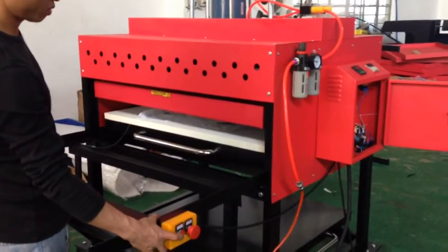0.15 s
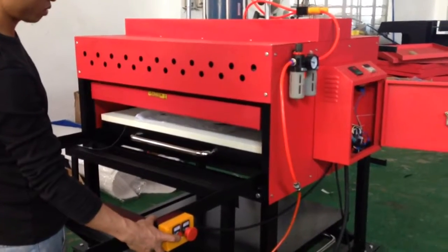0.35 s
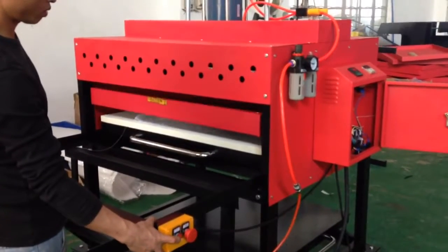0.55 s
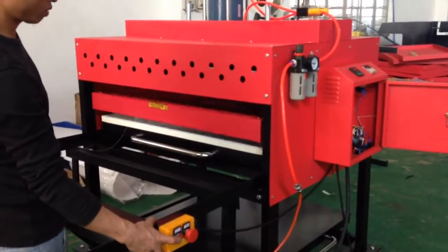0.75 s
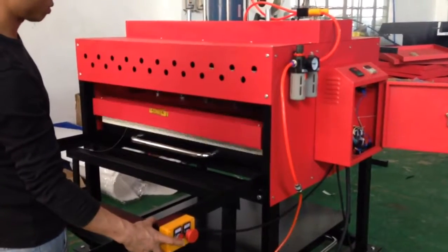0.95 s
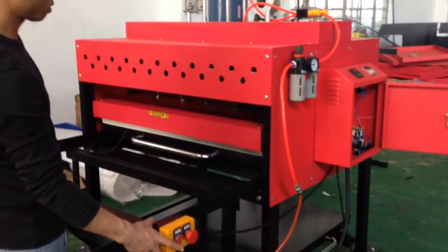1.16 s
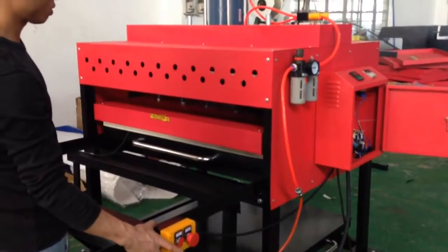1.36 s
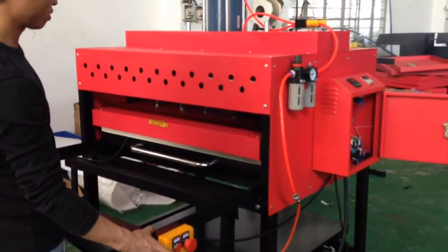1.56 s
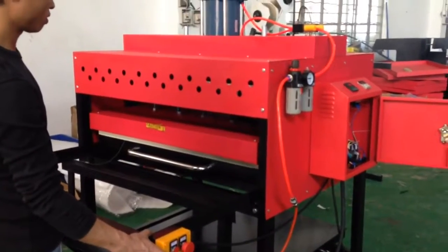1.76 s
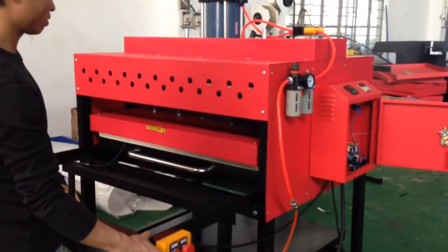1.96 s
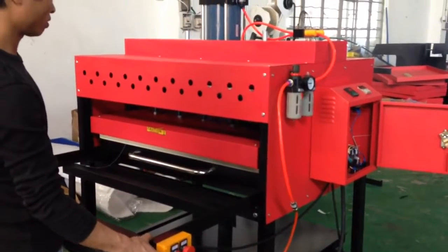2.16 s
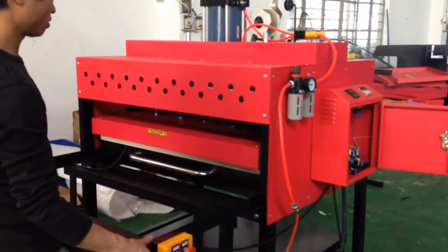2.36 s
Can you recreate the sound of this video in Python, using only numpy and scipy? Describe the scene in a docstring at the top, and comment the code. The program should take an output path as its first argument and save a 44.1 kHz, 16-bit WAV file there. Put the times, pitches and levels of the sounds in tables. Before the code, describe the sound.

Compressed air hisses loudly from a pneumatic press just after a valve clicks and knocks. The hiss dulls and sinks as the plate lands softly, leaving a low machine hum and a faint air leak in the workshop.

```python
"""An air-powered press closes in a workshop, where a small leak hisses and machines hum throughout. First an
electric valve clicks, then slams over and lets out a puff of air. The cylinder empties through a muffler with a
loud hiss, which dulls while its ringing band sinks as the pressure runs out. Meanwhile the press plate rubs and
squeaks on its way down. When it stops, the cylinder judders softly, the clamped frame drones briefly, and a few
faint ticks follow."""
import sys
import numpy as np
from scipy import signal
from scipy.fft import rfft, irfft
from scipy.io import wavfile
from scipy.ndimage import uniform_filter1d

SR = 44100
rng = np.random.default_rng(int(sys.argv[2]) if len(sys.argv) > 2 else 0)


def wav_out(sig):
    """Save sig, one row per channel (or a flat mono array), as 16-bit PCM at SR to the path in sys.argv[1]."""
    wavfile.write(sys.argv[1], SR, np.round(np.clip(np.atleast_2d(sig).T, -1, 1) * 32767).astype(np.int16))


N = 105840
T = np.arange(N) / SR

# how loud and bright the hiss is (time [s], level [dB], treble tilt [dB per octave])
HISS_FLOW = [(.24, -19, -0.5), (.35, -21, 0.5), (.6, -19.5, -0.7), (.85, -20.5, -2.5), (1.05, -21.5, -5),
             (1.24, -24.5, -4), (1.36, -29.5, -8.5), (1.46, -41, -10), (1.56, -45, -18), (1.68, -47.5, -32),
             (1.85, -76, -10), (2.0, -110, -16)]
# tone of the air rushing through the muffler (frequency [Hz], level [dB])
HISS_SPECTRUM = [(40, -40), (180, -53), (400, -13.5), (600, -17.5), (800, -10.5), (1250, -8.5), (1550, -2),
                 (2900, -4.5), (3250, -3.5), (5300, 3), (6500, 1), (7700, -2.5), (9100, 0), (10050, 4),
                 (10900, -6), (12400, 1), (13500, 0), (14200, -9), (15300, -3)]
# the ringing band that sinks with the pressure (time [s], centre [Hz], width [Hz], level [dB])
SINKING_BAND = [(.3, 4300, 1600, -50), (.42, 4360, 1190, -25.5), (.57, 4080, 980, -22),
                (.75, 3730, 850, -24.5), (.9, 3580, 534, -24.5), (1.0, 3300, 230, -27),
                (1.07, 3110, 190, -28.5), (1.19, 3120, 190, -28), (1.25, 2500, 420, -36.5),
                (1.37, 1960, 440, -38), (1.45, 1330, 560, -45), (1.529, 970, 338, -54),
                (1.6, 836, 200, -104)]
# the muffler favours that band's high side (frequency [Hz], gain [dB])
MUFFLER_FILTER = [(2000, -2), (2950, -4), (3200, -3), (6000, 6)]
# the exhaust pipe's upper ring swells, then fades (time [s], level [dB])
UPPER_RING = [(.4, -55), (.7, -25.5), (1.05, -28.5), (1.23, -27), (1.33, -35.5), (1.5, -59.5), (1.7, -96)]
# steady resonances of muffler and frame (frequency [Hz], width [Hz], boost [dB])
MUFFLER_PEAKS = [(735, 35, 5), (1025, 80, 7), (1470, 50, 4), (1820, 70, 3), (2030, 50, 4), (2295, 35, 4),
                 (2550, 90, 2), (3275, 130, 6), (3790, 50, 3), (4100, 60, 3), (4345, 40, 3), (6120, 50, 3)]
# the valve's two knocks (time [s], crack level [dB], rise [s], decay [s], rattle level [dB])
VALVE_KNOCKS = [(0.1662, -34, 0.0022, 0.0075, -41.5), (0.23, -18, .0006, 0.0023, -34)]
# tone of each knock's crack (frequency [Hz], level [dB])
CRACK_SPECTRUM = [(100, -2), (600, -11), (1200, -9.5), (2400, -14), (4200, 5.5), (6000, -3), (7500, -5),
                  (12000, -4), (15500, -7)]
# how the valve and its panel ring (frequency [Hz], width [Hz], level [dB], decay [s])
PANEL_RINGS = [(343, 16, -9.5, 0.051), (428, 28, -10.5, 0.058), (574, 25, -11.5, 0.041),
               (770, 150, -6.5, 0.036), (1090, 110, -0.5, 0.037), (1520, 350, -6.5, 0.045),
               (2100, 150, -12, 0.036), (3930, 110, -15, .025)]
# tone of the first puff (frequency [Hz], level [dB])
PUFF_SPECTRUM = [(30, -4), (70, -2), (160, -5), (300, 4), (600, -6), (1000, -10), (1300, 2), (1650, 5),
                 (2050, 3), (2500, -22), (8000, -25)]
# how the exhaust pipe rings (frequency [Hz], width [Hz], level [dB])
PIPE_RINGS = [(1030, 69, -44), (2040, 49, -28.5)]
# the plate rubs in its guides (time [s], length [s], level [dB])
PLATE_RUBS = [(0.551, 0.11, -45), (0.723, .04, -46), (0.749, 0.014, -49), (0.952, 0.081, -46),
              (1.17, 0.014, -39.5), (1.207, 0.087, -48.5)]
# how the frame rings (frequency [Hz], width [Hz], level [dB])
FRAME_RINGS = [(275, 18, -13.5), (343, 33, -13), (422.3, 13, 1.5), (484, 35, -10.5)]
# a guide squeaks softly (time [s], level [dB])
GUIDE_SQUEAK = [(.57, -75), (.605, -45), (.75, -49), (.79, -75)]
# the cylinder judders as the press stops (time [s], pitch [Hz], level [dB])
CYLINDER_JUDDER = [(1.17, 80, -68), (1.189, 78.6, -36), (1.21, 80, -34), (1.228, 81, -57), (1.25, 89, -38),
                   (1.28, 89, -39), (1.295, 91, -47), (1.313, 94, -32), (1.335, 90, -70)]
# the clamped frame drones (time [s], level [dB])
FRAME_DRONE = [(1.33, -75), (1.39, -49), (1.49, -56), (1.598, -69)]
# tone of the air leak (frequency [Hz], level [dB])
LEAK_SPECTRUM = [(800, -31), (2800, -15.5), (3300, -6.5), (3800, -1), (4040, 4), (4300, -7.5), (4900, -1.5),
                 (5400, -2.5), (6200, -10), (7900, -9.5), (8350, -4), (9300, -6), (11000, -10.5),
                 (13000, -5), (15300, -4)]
# tone of the machines' rumble (frequency [Hz], level [dB])
RUMBLE_SPECTRUM = [(20, -18), (40, -24), (65, 2.5), (105, -4), (135, -6), (300, -6.5), (450, -12),
                   (650, -17.5), (1200, -20), (2200, -20), (5000, -22), (15000, -50)]
# the machines' hum (frequency [Hz], level [dB])
HUM_TONES = [(66, -66.5), (101, -64.5), (183, -65), (355, -69)]
# faint workshop ticks (time [s], level [dB])
FAINT_TICKS = [(1.935, -51), (2.235, -55), (2.314, -57)]
# tone of a tick (frequency [Hz], level [dB])
TICK_SPECTRUM = [(300, -16), (1200, 5), (2600, 6.5), (6000, -14), (15000, -27)]
# how long the workshop echoes (frequency [Hz], time to fade by 60 dB [s])
ECHO_TIMES = [(100, 0.31), (500, 0.92), (1500, 0.76), (3200, 1), (6000, 0.61), (10000, 0.76), (15000, 0.54)]

OPEN_S, OPEN_RISE_S, TREBLE_LAG_S = .231, .013, .003
TILT_FROM_HZ, TREBLE_FROM_HZ = 3960, 5600
PATCH_DB, FLUTTER_DB, ECHO_DB = 1.55, .29, -6.5
LIMIT_DB, SQUEEZE, RECOVER_DB_PER_S = -26.5, .37, 4


def exhaust(size=512):
    """Swirling air leaves the muffler: a broad hiss, a sinking band and an upper ring of steady pitch."""
    frames = dict(nperseg=size, noverlap=size * 3 // 4)
    hz, t, white = signal.stft(rng.standard_normal(N), SR, **frames)
    hz = hz[:, None]
    level_db, tilt = follow(HISS_FLOW, t)
    treble_octaves = np.log2(1 + (hz / TILT_FROM_HZ) ** 4) / 4
    broad = unit(amp(read(HISS_SPECTRUM, hz))) * amp(level_db + tilt * treble_octaves)
    centre, width, band_db = follow(SINKING_BAND, t)
    band = hump(hz, centre, width) * amp(read(MUFFLER_FILTER, hz))
    band = band / np.sqrt((band ** 2).mean(0)) * amp(band_db)
    upper = unit(hump(hz, centre=4720, width=1180)) * amp(follow(UPPER_RING, t)[0])
    # random louder and softer patches across pitch and time
    patches = uniform_filter1d(rng.standard_normal(white.shape), size=5, axis=0)
    patches = unit(uniform_filter1d(patches, size=8, axis=1))
    gain = np.sqrt(broad ** 2 + band ** 2 + upper ** 2) * amp(PATCH_DB * patches)
    hiss = signal.istft(white * gain, SR, **frames)[1][:N]
    hiss = filtered(hiss, lambda f: amp(sum(
        db / (1 + (2 * (f - peak) / wide) ** 2) for peak, wide, db in MUFFLER_PEAKS)))
    return open_port(hiss) * amp(FLUTTER_DB * wander(hz=55))


def open_port(hiss):
    """The outlet opens: the lower part of the hiss comes first, its treble just after."""
    low = filtered(hiss, lambda f: 1 / (1 + (f / TREBLE_FROM_HZ) ** 8))
    return low * ramp(OPEN_S, OPEN_RISE_S) + (hiss - low) * ramp(OPEN_S + TREBLE_LAG_S, OPEN_RISE_S)


def valve():
    """A magnet clicks, then the valve slams over with a puff of air; both knocks rattle its panel."""
    sound = amp(-30) * coloured(PUFF_SPECTRUM) * burst(OPEN_S, rise=.006, decay=.044)
    for start, crack_db, rise, decay, rattle_db in VALVE_KNOCKS:
        rattle = sum(amp(db) * ringing(hz, width) * burst(start, rise=.012, decay=ring_s)
                     for hz, width, db, ring_s in PANEL_RINGS)
        crack = coloured(CRACK_SPECTRUM) * burst(start, rise, decay)
        sound += amp(crack_db) * crack + amp(rattle_db) * rattle
    return sound


def pipe():
    """The exhaust pipe rings briefly when the air first hits it."""
    ring = sum(amp(db) * ringing(hz, width) for hz, width, db in PIPE_RINGS)
    return ring * burst(OPEN_S, rise=.017, decay=.028)


def plate_rubbing():
    """The sliding plate makes the frame groan and a guide squeak."""
    groan = noise(lambda f: sum(amp(db) * hump(f, hz, width) for hz, width, db in FRAME_RINGS))
    grip = sum(amp(db) * ramp(start, rise=.0059) * np.exp(-np.maximum(T - start - length, 0) / .01)
               for start, length, db in PLATE_RUBS)
    squeak = fade(*np.transpose(GUIDE_SQUEAK)) * np.sin(wobbly_phase(hz=266, wobble=.011))
    return groan * grip + squeak


def press_stopping():
    """The cylinder judders as the press stops; once clamped, the frame drones faintly and settles."""
    times, pitch, db = np.transpose(CYLINDER_JUDDER)
    phase = wobbly_phase(np.interp(T, times, pitch), wobble=.08)
    shudder = fade(times, db) * (np.sin(phase) + amp(-17) * np.sin(2 * phase))
    drone = fade(*np.transpose(FRAME_DRONE)) * np.sin(wobbly_phase(hz=98.2, wobble=.06))
    return shudder + drone


def room_echo(sound, size=256):
    """Many small reflections blur into a tail, each pitch range fading at its own speed."""
    reflections = rng.standard_normal(SR) * (rng.random(SR) < .08) * (T[:SR] > .004)
    hz, t, bands = signal.stft(reflections, SR, nperseg=size)
    decay = amp(-60 * t / read(ECHO_TIMES, hz)[:, None])
    tail = signal.istft(bands * decay, SR, nperseg=size)[1]
    return signal.fftconvolve(sound, tail / np.linalg.norm(tail))[:N]


def workshop():
    """Machines hum and rumble, air leaks, and a few faint ticks sound."""
    hum = sum(amp(db) * np.sqrt(2) * np.sin(wobbly_phase(hz, wobble=.0135, rate_hz=7))
              for hz, db in HUM_TONES)
    tick_gain = sum(amp(db) * burst(start, rise=.0011, decay=.008) for start, db in FAINT_TICKS)
    ticks = coloured(TICK_SPECTRUM) * tick_gain
    leak = amp(-48.5 + .5 * wander(hz=9)) * coloured(LEAK_SPECTRUM)
    rumble = amp(-56.5) * coloured(RUMBLE_SPECTRUM)
    return leak + rumble + hum + ticks


def amp(db):
    """Turns decibels into a gain."""
    return 10 ** (np.asarray(db) / 20)


def unit(x):
    """Scales to an average power of 1."""
    return x / np.sqrt(np.mean(x ** 2) + 1e-20)


def read(table, hz):
    """Looks up a table by frequency, on an octave scale."""
    frequencies, values = np.transpose(table)
    return np.interp(np.log(hz + 1), np.log(frequencies), values)


def follow(table, t):
    """Looks up each value column of a table by time."""
    times, *columns = np.transpose(table)
    return [np.interp(t, times, column) for column in columns]


def hump(hz, centre, width):
    """Gain of a resonance: 1 at its centre, less on both sides."""
    return (1 + ((hz - centre) / width) ** 2) ** -1.15


def filtered(sound, gain):
    """Scales each frequency by gain(hz)."""
    return irfft(rfft(sound) * gain(np.fft.rfftfreq(N, 1 / SR)), N)


def noise(gain):
    """Noise of power 1, shaped by gain(hz)."""
    return unit(filtered(rng.standard_normal(N), gain))


def coloured(table):
    """Noise with the tone that a table gives."""
    return noise(lambda hz: amp(read(table, hz)))


def ringing(hz, width):
    """Noise gathered around one pitch."""
    return noise(lambda f: hump(f, hz, width))


def wander(hz):
    """Random drift, up to about this rate."""
    return noise(lambda f: 1 / (1 + (f / hz) ** 4))


def wobbly_phase(hz, wobble, rate_hz=23):
    """Phase of a slightly unsteady vibration."""
    return 2 * np.pi * np.cumsum(hz * (1 + wobble * wander(rate_hz))) / SR


def ramp(start, rise):
    """Climbs from 0 to 1 and stays there."""
    return np.clip((T - start) / rise, 0, 1)


def burst(start, rise, decay):
    """Climbs, then dies away; times in seconds."""
    return ramp(start, rise) * np.exp(-np.maximum(T - start, 0) / decay)


def fade(times, db):
    """Gain from a level curve, silent outside it."""
    return amp(np.interp(T, times, db)) * (T > times[0]) * (T < times[-1])


def scene():
    """The press in its workshop, the same in both ears."""
    press = exhaust() + valve() + pipe() + plate_rubbing()
    mono = press + amp(ECHO_DB) * room_echo(press) + press_stopping() + workshop()
    return np.array([mono, mono])


def record(dry):
    """Automatic volume control holds the hiss down and recovers slowly; the highest treble is cut."""
    power_db = 10 * np.log10(abs(uniform_filter1d(dry[0] ** 2, size=900)) + 1e-12)
    recovery_db = T * RECOVER_DB_PER_S
    peak_db = np.maximum.accumulate(power_db + recovery_db) - recovery_db
    over_db = np.maximum(peak_db - LIMIT_DB, 0)
    held = dry * amp(-SQUEEZE * uniform_filter1d(over_db, size=400))
    low_pass = signal.firwin(701, cutoff=15550, window=("kaiser", 9), fs=SR)
    return signal.oaconvolve(held, low_pass[None], "same")


dry = scene()
out = record(dry)
wav_out(out)
```